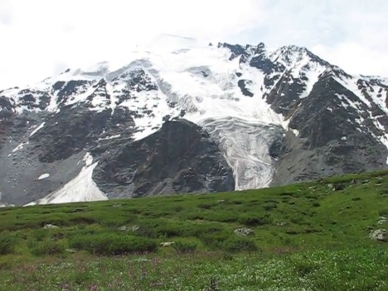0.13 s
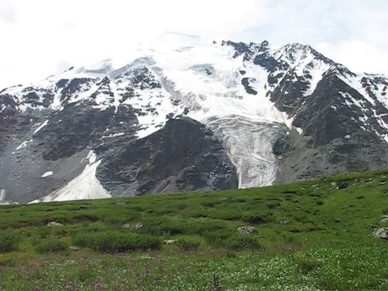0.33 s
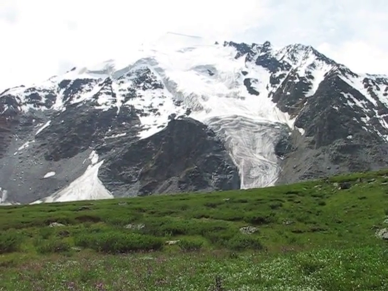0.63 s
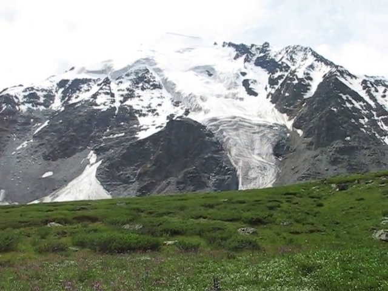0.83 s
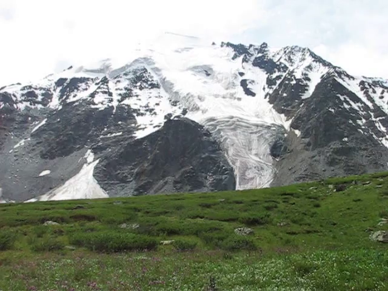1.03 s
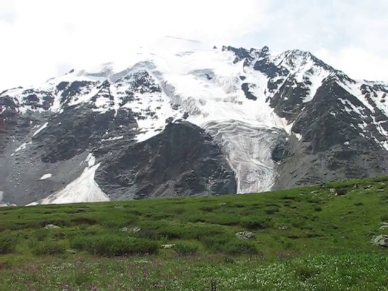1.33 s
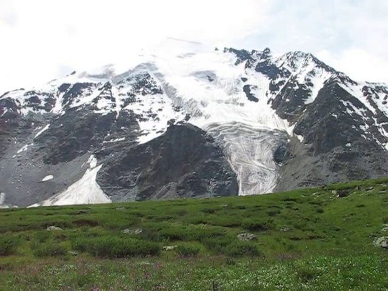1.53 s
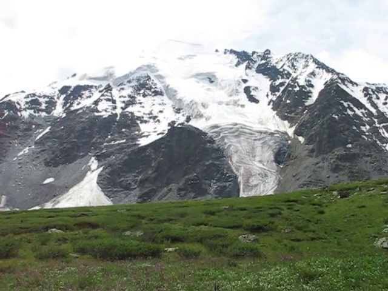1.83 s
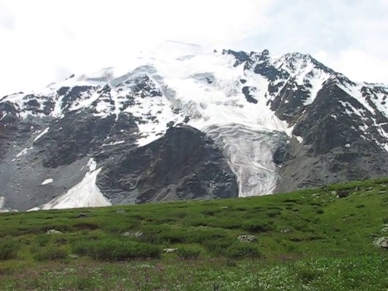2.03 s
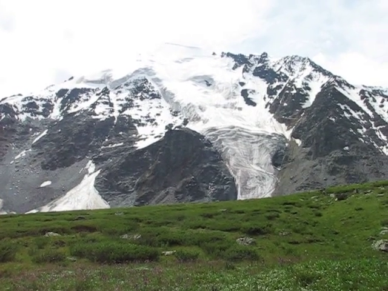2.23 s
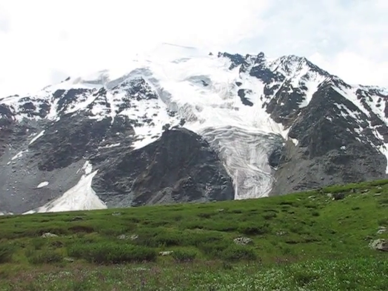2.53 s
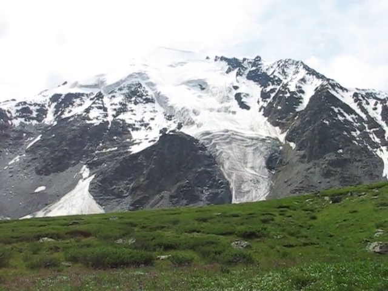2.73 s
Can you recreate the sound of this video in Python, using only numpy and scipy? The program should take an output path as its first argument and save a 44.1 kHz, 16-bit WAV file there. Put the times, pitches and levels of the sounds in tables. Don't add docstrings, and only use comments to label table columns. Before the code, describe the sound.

Gusty wind buffets a small camera microphone in an open mountain meadow, rumbling, thumping and overloading

```python
import sys
import numpy as np
from scipy import signal
from scipy.fft import rfft, irfft, next_fast_len
from scipy.io import wavfile
from scipy.ndimage import uniform_filter1d, map_coordinates

SR = 44100
rng = np.random.default_rng(int(sys.argv[2]) if len(sys.argv) > 2 else 0)


def transcribe(signal):
    frames = np.atleast_2d(signal).T
    limited = np.clip(frames, -1, 1)
    pcm = np.round(limited * 32767).astype(np.int16)
    wavfile.write(sys.argv[1], SR, pcm)


def invert_db(level):
    return 10 ** (np.asarray(level, dtype=float) / 20)


N = 127890
TO_BOTH_DB = [[0], [-34]]


def unit(x):
    return x / np.sqrt(np.mean(x ** 2, axis=-1, keepdims=True) + 1e-20)


def along(points, hz):
    f, v = np.transpose(points)
    return np.interp(np.log(hz + 1), np.log(f + 1), v)


def curves(rows):
    s, *cols = np.transpose(rows)
    return np.array([np.interp(np.arange(N) / SR, s, c) for c in cols])


def wobble(knots_hz):
    return map_coordinates(rng.standard_normal(size=400), [np.arange(N) * knots_hz / SR])


def coloured(spectrum, shape):
    hz = np.fft.rfftfreq(shape[-1], 1 / SR)
    gain = invert_db(along(spectrum, hz)) * np.minimum(hz / spectrum[0][0], 1) ** 2
    return unit(irfft(rfft(rng.standard_normal(shape)) * gain, shape[-1]))


def shaped(noise, envelope):
    burst = noise * envelope
    return burst * np.linalg.norm(envelope) / np.linalg.norm(burst)


def add(track, s, piece):
    part = track[..., round(s * SR):][..., :piece.shape[-1]]
    part += piece[..., :part.shape[-1]]


# t/s, level/dB
GAIN = [
    (0, 0),
    (1.33, 0),
    (1.39, -5.5),
    (1.55, -0.5),
    (1.9, 2),
    (1.99, -3.5),
    (2.095, -4),
    (2.125, -9),
    (2.5, -7),
    (2.9, -4.5),
]


def gain_db():
    return curves(GAIN)[0]


# t/s, level/dB
FLOW = [(0, -13), (.09, -28.5), (.4, -28), (.8, -23.5), (1.1, -23), (1.27, -31.5), (1.48, -21.5),
        (1.65, -26), (1.76, -16), (1.9, -25.5), (2.06, -12), (2.16, -14.5), (2.24, -20.5), (2.38, -15.5),
        (2.53, -16), (2.62, -23), (2.7, -14.5), (2.9, -11)]
# t/s, level/dB
LEE_FLOW = [(0, -35), (.47, -35), (.56, -28), (.85, -30), (1.45, -28), (1.58, -27), (1.7, -30), (1.97, -26),
            (2.13, -32), (2.23, -22), (2.36, -30), (2.55, -25), (2.66, -31), (2.9, -32)]
# f/Hz, level/dB per Hz
DULL = [(20, -71), (50, -13.5), (115, 0.5), (200, -9), (400, -25.5), (800, -71), (2000, -87)]
# f/Hz, level/dB per Hz
SHARP = [(60, -37.5), (200, 7.5), (350, -0.5), (600, -15), (1200, -32), (3000, -50.5), (8000, -83)]
# f/Hz, level/dB per Hz
LEE = [(15, -10), (40, -2), (90, 0), (180, -10), (400, -30), (1000, -65)]


def flow():
    left_db = 2.5 * wobble(22) + 2.5 * wobble(40)
    right_db = 1.3 * wobble(12) + 2.2 * wobble(35.3)
    top_db = 5
    lumps_db = top_db * np.tanh(np.array([left_db, right_db]) / top_db)
    body = np.array([coloured(DULL, (N,)), coloured(LEE, (N,))])
    edge_db = 0.94 * lumps_db + [[-13], [-24]] - gain_db()
    rumble = invert_db(lumps_db) * (body + invert_db(edge_db) * coloured(SHARP, (2, N)))
    span = round(0.09 * SR)
    power = uniform_filter1d(uniform_filter1d(rumble ** 2, span), span)
    wind_db = [curves(FLOW)[0], curves(LEE_FLOW)[0]]
    return invert_db(wind_db) * rumble / np.sqrt(np.abs(power))


# t/s, level/dB
FAR = [(0, -0.5), (.12, 0), (.22, 2), (.32, 0.5), (.6, 0.5), (1, 0.5), (1.5, 0), (1.8, 0.5), (2.3, 1),
       (2.9, 1.5)]
# f/Hz, level/dB per Hz
FAR_LEFT = [(150, 6), (500, -3.5), (1200, -5), (2500, -9.5), (4000, -14), (7500, -18), (9000, -23.5),
            (16000, -33)]
# f/Hz, level/dB per Hz
FAR_RIGHT = [(150, -2), (500, -4.5), (1200, -7), (2500, -13.5), (4000, -20), (7500, -21), (9000, -26),
             (16000, -36)]
# f/Hz, likeness [-1..1]
ALIKE = [(60, 0.04), (130, 0.97), (290, 0.051), (640, 0.89), (1410, 0.38), (3100, -0.43), (6820, -0.3),
         (15000, 0.37)]
FAR_DB = [-38.5, -39.5]


def far_hiss():
    pair = rfft(rng.standard_normal((2, N)))
    hz = np.fft.rfftfreq(N, 1 / SR)
    turn = np.arccos(np.clip(along(ALIKE, hz), -1, 1)) / 2
    mid, side = pair[0] * np.cos(turn), pair[1] * np.sin(turn)
    colour = invert_db([along(FAR_LEFT, hz), along(FAR_RIGHT, hz)]) * np.minimum(hz / 150, 1) ** 2
    hiss = unit(irfft(colour * [mid + side, mid - side], N))
    strength_db = curves(FAR)[0] + 0.17 * wobble(4.08) + 0.35 * wobble(28.67)
    return invert_db(FAR_DB)[:, None] * hiss * invert_db(strength_db)


WHINE_HZ = [7867.1, 8265.0]
# left level/dB, right level/dB
WHINE_DB = [
    [-63, -51],
    [-71, -52],
]
WHINE_NOISE_DB = [-66, -57]


def whine():
    flip_hz, centre_hz, width_hz = 14.985, 8050, 380
    t = np.arange(N) / SR
    flip = np.sign(np.sin(2 * np.pi * (flip_hz * t + 0.12)))
    tones = np.sqrt(2) * flip * np.sin(2 * np.pi * np.outer(WHINE_HZ, t))
    hz = np.fft.rfftfreq(N, 1 / SR)
    band = np.exp(-((hz - centre_hz) / width_hz) ** 2)
    noise = unit(irfft(rfft(rng.standard_normal((2, N))) * band, N))
    return invert_db(WHINE_DB).T @ tones + invert_db(WHINE_NOISE_DB)[:, None] * noise


# f/Hz, level/dB per Hz
DEEP = [(15, -3), (35, -2), (70, 11), (110, -3.5), (200, -33), (400, -64)]
DEEP_DB = [-22, -70]


def deep_rumble():
    return invert_db(DEEP_DB)[:, None] * invert_db(0.34 * wobble(4.1)) * coloured(DEEP, (2, N))


# t/s, peak level/dB, brightness/dB, length/s
EDDIES = [(0.024, -8.5, -28, 0.055), (0.305, -5.5, -52, 0.03), (0.468, 2, -21, 0.02),
          (0.524, -14.5, -11.5, 0.034), (0.626, -6, -33, 0.067), (0.716, -7, -39, 0.067),
          (0.769, -1, -27.5, 0.035), (0.888, -14, -17, 0.13), (0.935, -5.5, -51, 0.051),
          (1.031, -4, -47, 0.071), (1.135, -2.5, -16.5, 0.017), (1.208, -5.5, -21.5, 0.04),
          (1.233, 1, -21.5, 0.032), (1.3, -8, -6.5, 0.02), (1.336, 1.5, -13.5, 0.053),
          (1.421, -6.5, -16, 0.029), (1.511, -4.5, -25, 0.032), (1.583, -3, -24, 0.049),
          (1.798, -5, -27, 0.067), (1.922, -6.5, -10, 0.032), (1.949, 0, -16.5, 0.053),
          (2.093, -5.5, -5, 0.031), (2.192, -4.5, -5.5, 0.026), (2.243, -9, -8, 0.055),
          (2.322, -3, -12, 0.038), (2.388, -26, -26, 0.025), (2.45, -4.5, -12, 0.034),
          (2.587, -9.5, -10.5, 0.022), (2.706, -0.5, -29, 0.033), (2.799, -16, -13, 0.032),
          (2.66, -2.5, -21, 0.02)]


def eddies():
    rise_s, trim_db, bright_trim_db = 0.01165, -6.5, 14
    out, t = np.zeros(N), np.arange(SR // 5) / SR
    dull = coloured(DULL, (len(EDDIES), len(t)))
    sharp = coloured(SHARP, (len(EDDIES), len(t)))
    for k, (s, db, bright_db, length_s) in enumerate(EDDIES):
        swell = np.clip(t / rise_s, 0, 1) * np.exp(-(t / max(length_s, 0.01)) ** 1.9)
        edge = invert_db(bright_db + bright_trim_db) * shaped(sharp[k], swell)
        add(out, max(s - rise_s / 2, 0), invert_db(db + trim_db) * (shaped(dull[k], swell) + edge))
    return out


# t/s, peak level/dB
FLICKS = [(0.039, -26), (0.471, -45), (0.715, -28), (0.784, -25), (0.87, -35), (1.136, -35), (1.208, -24),
          (1.304, -18), (1.336, -18.5), (1.467, -27), (1.533, -24), (1.612, -34), (1.701, -38),
          (1.75, -23.5), (1.808, -29.5), (1.929, -17.5), (1.958, -16), (2.076, -23), (2.097, -11),
          (2.204, -35), (2.205, -10.5), (2.241, -20.5), (2.263, -15.5), (2.278, -7.5), (2.321, -13),
          (2.39, -35), (2.441, -19.5), (2.447, -15.5), (2.521, -23.5), (2.588, -24), (2.599, -21),
          (2.661, -40), (2.693, -26), (2.763, -22), (2.803, -21.5), (2.84, -19), (2.17, -34), (2.215, -13),
          (2.3, -21), (2.34, -23), (2.478, -30), (2.555, -28), (2.71, -23), (2.785, -21.5), (2.865, -26),
          (1.357, -8), (1.378, -16), (2.122, -15.5), (2.135, -19), (2.15, -20), (2.29, -22), (2.33, -17.5),
          (2.355, -34), (1.99, -22.5), (.53, -31.5), (.575, -32), (1.365, -18), (2.492, -25)]
# f/Hz, level/dB per Hz
FLICK = [(200, -18.5), (450, 8), (800, -4.5), (1300, -20), (2500, -36), (6000, -70)]


def flicks():
    rise_s, t60_s, trim_db = 0.0042, 0.036, -1.5
    out, t = np.zeros(N), np.arange(SR // 10) / SR
    shape = np.sin(np.pi / 2 * np.clip(t / rise_s, 0, 1)) ** 2 * invert_db(-60 * t / t60_s)
    for (s, db), noise in zip(FLICKS, coloured(FLICK, (len(FLICKS), len(t)))):
        add(out, s, 2 * invert_db(db + trim_db) * shaped(noise, shape))
    return out


# t/s, peak level/dB, width/s
SLAPS = [(0.041, -0.2, 0.0028), (.476, -5, 0.003), (.531, -7, .007), (0.65, -3, .0052), (.722, -6, 0.0032),
         (0.787, -5.5, 0.0045), (1.136, -2, 0.007), (1.301, -13, 0.0035), (1.356, 0, 0.0055),
         (1.379, 0.5, .004), (1.596, -2, 0.0043), (1.927, 2, 0.0032), (1.958, 1, .005), (2.101, 3, 0.0067),
         (2.197, -7, 0.0057), (2.268, -17, 0.0055), (2.281, 1.5, 0.0022), (2.327, -18, 0.0023),
         (2.46, 1, 0.0032), (2.523, -4.5, 0.0034), (.676, -8.5, .004), (0.447, -15, 0.0027),
         (0.572, -15.5, 0.0027), (0.943, -7, 0.0045), (2.6, -3.5, 0.004), (2.807, -2, .004),
         (1.261, -10, .0045)]
# t/s, peak level/dB
LEE_SLAPS = [
    (0.552, -21),
    (.592, -34),
    (1.543, -16),
    (1.573, -19),
    (2.047, -19),
    (2.174, -20),
    (2.234, -30),
    (2.257, -23),
    (2.449, -23),
    (2.762, -19),
]


def slaps():
    pinch, rebound, widest_s, lee_width_s = 1.5, 0.22, 0.0045, 0.011
    out, t = np.zeros((2, N)), np.arange(-SR // 25, SR // 25) / SR

    def dip(width_s):
        u = pinch * t / width_s
        return (2 * u * u - 1 + rebound * u ** 3) * np.exp(-u * u)

    for s, db, width_s in SLAPS:
        add(out[0], s + t[0], invert_db(db) * dip(min(width_s, widest_s)))
    for s, db in LEE_SLAPS:
        add(out[1], s + t[0], invert_db(db) * dip(lee_width_s))
    return out


def sheltered():
    swept_share, swept_s = 0.6, 0.006
    away = (np.arange(N) / SR - np.array(SLAPS)[:, :1]) / swept_s
    return 1 - swept_share * np.exp(-away ** 2).max(axis=0)


# t/s, length/s, left level/dB, right level/dB, low band gain (ratio)
RUSTLES = [
    (1.668, .25, -62, -49, .25),
    (2.548, .055, -67.5, -66.5, 5.5),
    (2.61, .03, -66, -65, 5.5),
    (.15, .12, -70, -63, 2.5),
]
# f/Hz, level/dB per Hz
RUSTLE = [(5000, -18), (6500, -7), (7800, 0), (9200, -8), (11500, -17), (13300, -10), (14800, -5),
          (16500, -6)]
# f/Hz, level/dB per Hz
RUSTLE_LOW = [(1800, -14), (2700, -4), (3600, -12), (5300, 0), (6500, -12), (8600, -1), (10500, -30)]


def rustles():
    rise_s, start, fade_share, grain_db = 0.025, 0.03, 0.5, 1.1
    out, t = np.zeros((2, N)), np.arange(SR // 2) / SR
    for s, length_s, left_db, right_db, low in RUSTLES:
        attack = np.clip(start + t / rise_s, 0, 1)
        fade = np.clip((length_s - t) / (fade_share * length_s) + 0.5, 0, 1)
        grain = invert_db(grain_db * wobble(45)[:len(t)])
        noise = coloured(RUSTLE, (2, len(t))) + low * coloured(RUSTLE_LOW, (2, len(t)))
        add(out, s, invert_db([[left_db], [right_db]]) * attack * fade * grain * noise)
    return out


def snaps(table, spectrum):
    rise_s, t60_s = 0.0015, 0.016
    out, t = np.zeros((2, N)), np.arange(SR // 2) / SR
    shape = np.sin(np.pi / 2 * np.clip(t / rise_s, 0, 1)) ** 2 * invert_db(-60 * t / t60_s)
    for s, *db in table:
        add(out, s, invert_db(db)[:, None] * shape * coloured(spectrum, (2, len(t))))
    return out


# t/s, left level/dB, right level/dB
CRACKS = [
    (1.674, -55, -40),
    (2.622, -48, -36),
    (2.894, -35, -34),
    (2.898, -31, -31),
]
# f/Hz, level/dB per Hz
CRACK = [(1000, -12), (2400, 0), (3600, -9), (5300, -6), (10000, -22), (16000, -32)]


def cracks():
    return snaps(CRACKS, CRACK)


# t/s, left level/dB, right level/dB
TICKS = [
    (2.105, -11.5, -56),
    (2.196, -13.5, -52),
    (2.264, -16, -56),
    (2.457, -31, -49),
    (2.599, -22.5, -50),
]
# f/Hz, level/dB per Hz
TICK = [(300, -30), (900, 16), (2500, 0), (5000, -17), (9000, -28), (16000, -48)]


def ticks():
    return snaps(TICKS, TICK)


def scene():
    steady = invert_db(gain_db()) * (far_hiss() + whine() + deep_rumble())
    details = rustles() + cracks() + ticks()
    turbulence = flow() + eddies() * invert_db(TO_BOTH_DB)
    gusts = turbulence * [sheltered(), np.ones(N)] + slaps() + flicks() * invert_db(TO_BOTH_DB)
    return steady + details + gusts


def low_pass(x):
    return signal.sosfilt(signal.butter(12, 16320, fs=SR, output="sos"), x)


def record(dry):
    ceiling, knee, top_hz = 1.02, 11, 15760
    hole_hz, hole_width_hz, hole_db = 8800, 190, 25
    x = dry / (1 + np.abs(dry / ceiling) ** knee) ** (1 / knee)
    m = next_fast_len(N + SR // 10)
    hz = np.fft.rfftfreq(m, 1 / SR)
    x = irfft(rfft(x, m) * (hz < top_hz), m)[:, :N]
    hole = (1 - invert_db(-hole_db)) * np.exp(-((hz - hole_hz) / hole_width_hz) ** 4)
    gap = irfft(rfft(x[1], m) * hole, m)[:N]
    flicker = np.clip(3 * wobble(16) + 1.8, 0, 1)
    x = x - np.outer([0, 1], gap * flicker)
    return low_pass(x)


dry = scene()
out = record(dry)
transcribe(out)
```